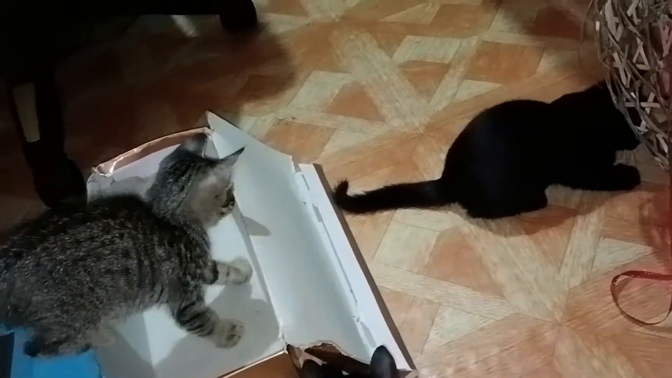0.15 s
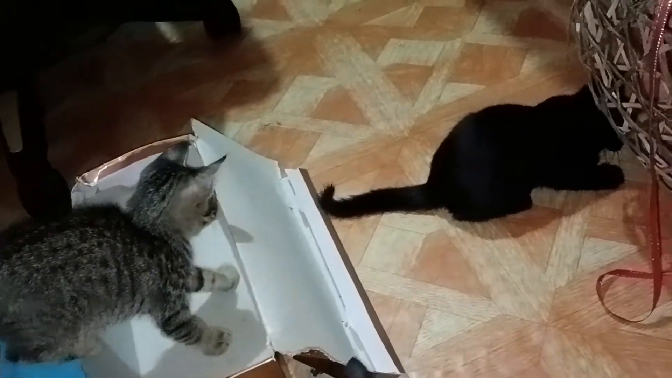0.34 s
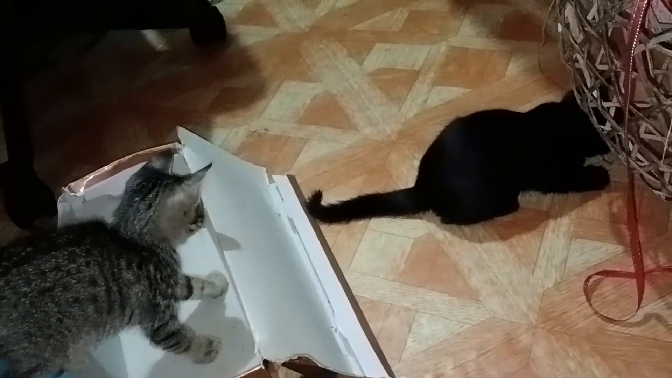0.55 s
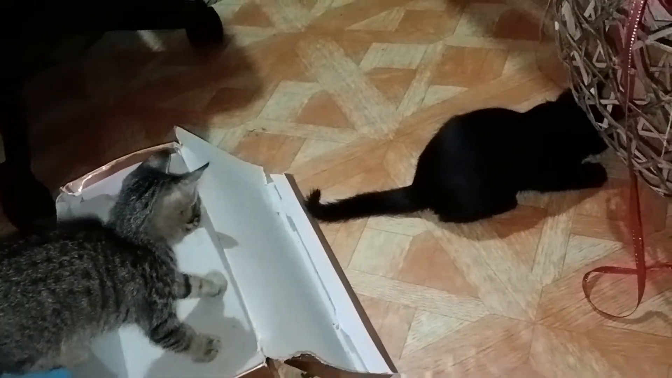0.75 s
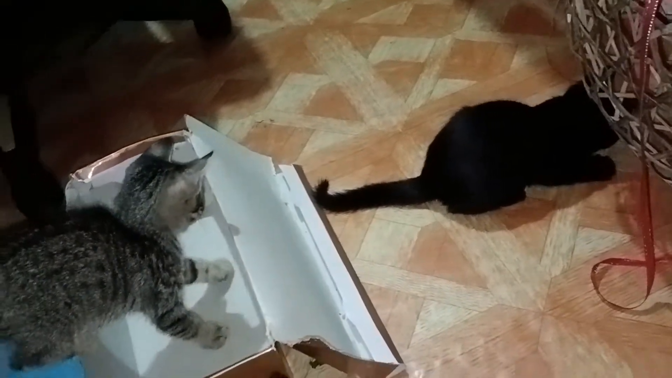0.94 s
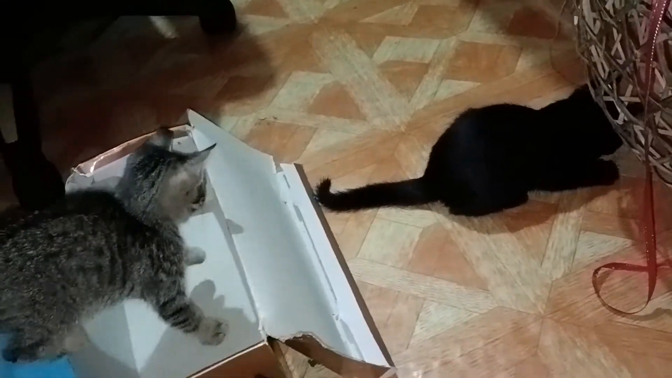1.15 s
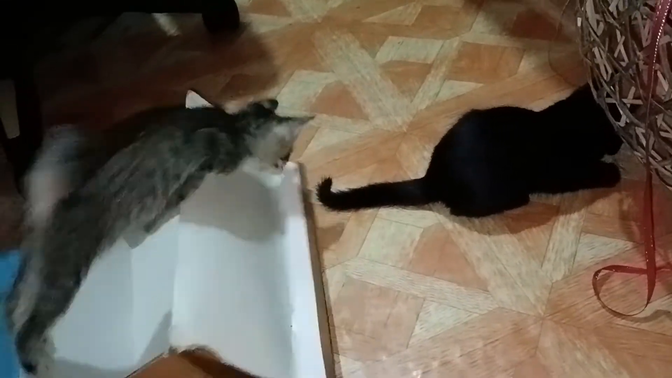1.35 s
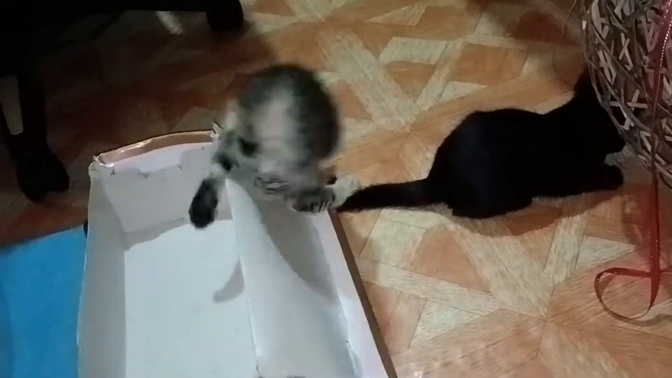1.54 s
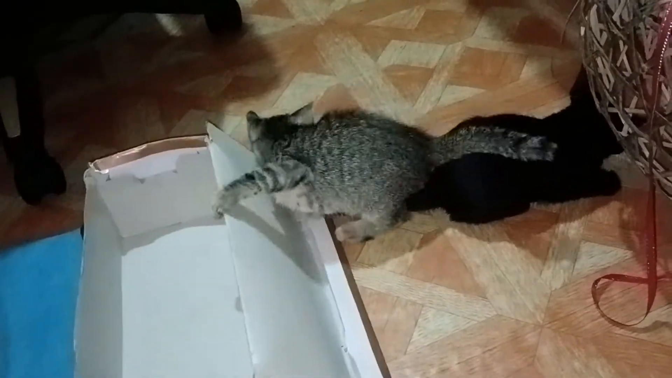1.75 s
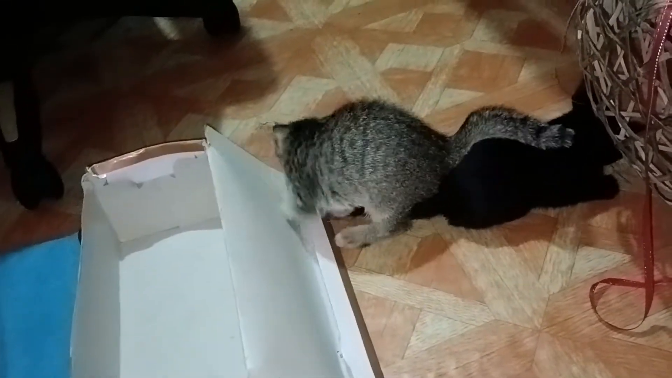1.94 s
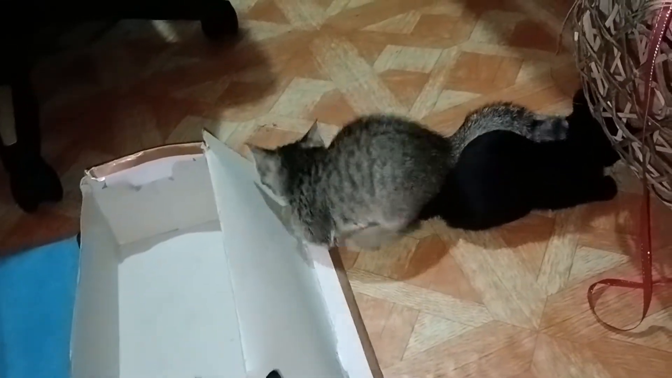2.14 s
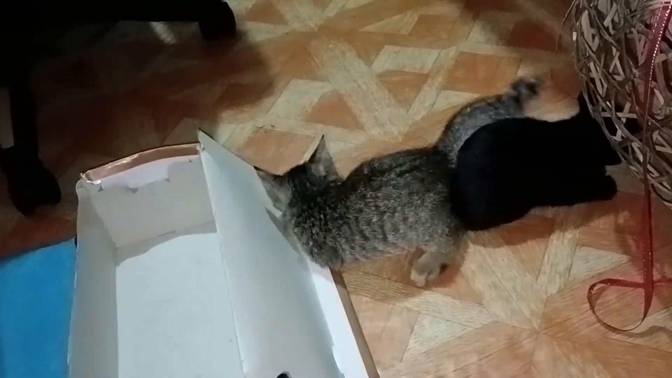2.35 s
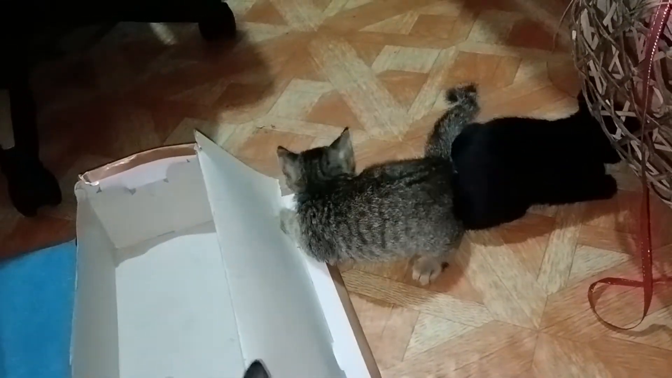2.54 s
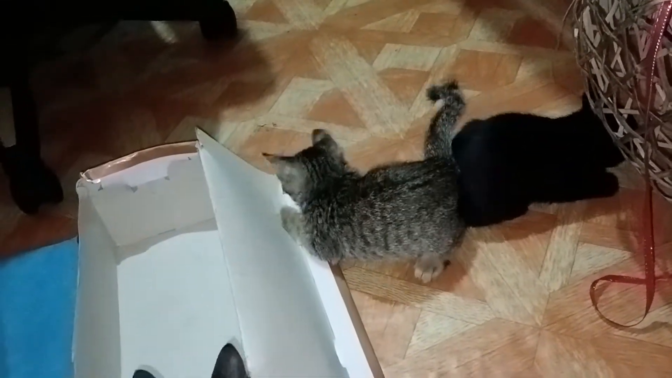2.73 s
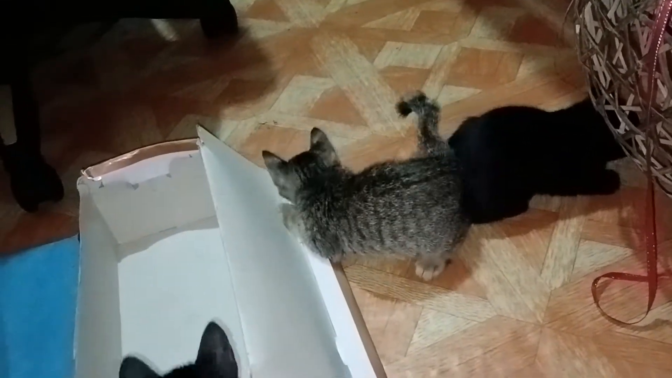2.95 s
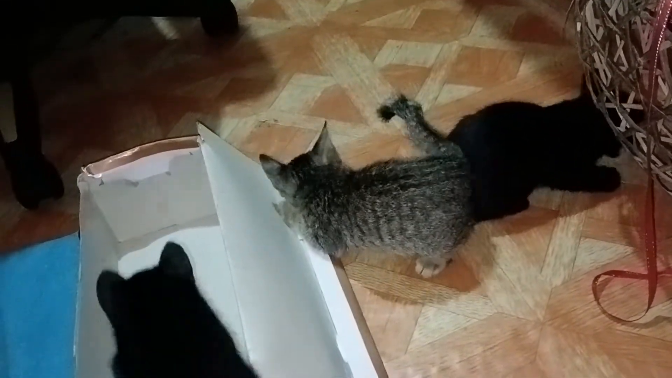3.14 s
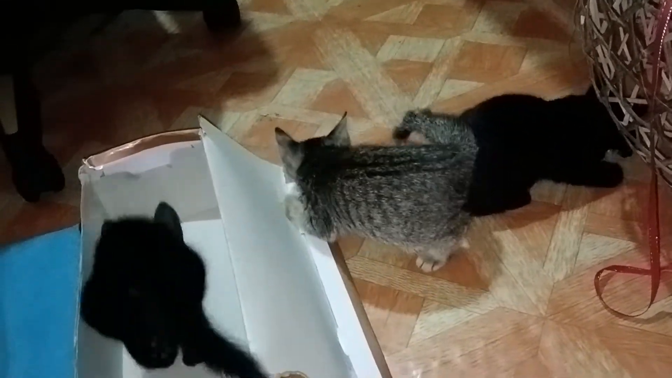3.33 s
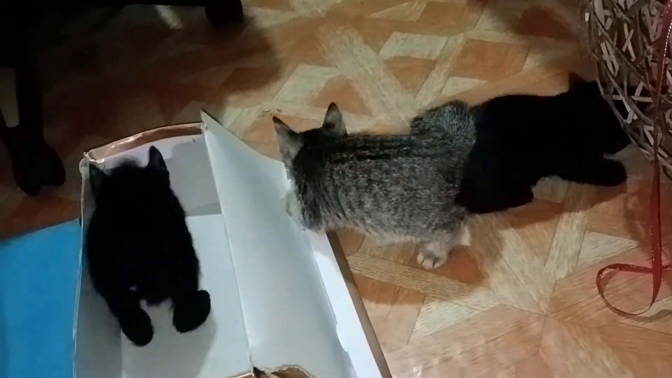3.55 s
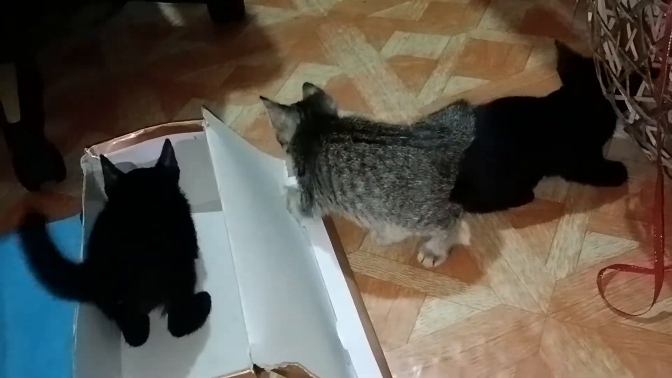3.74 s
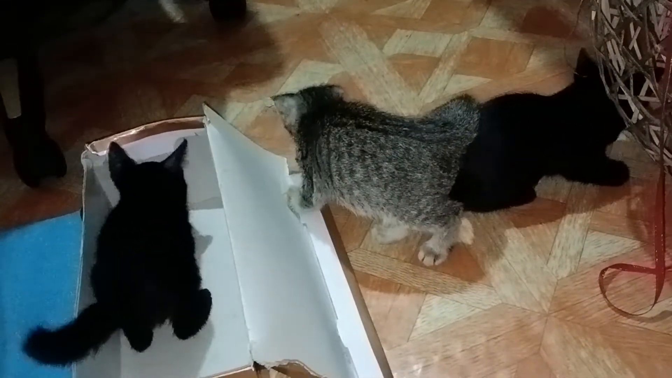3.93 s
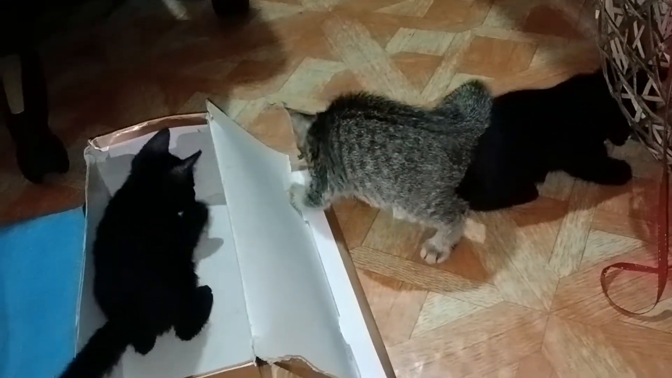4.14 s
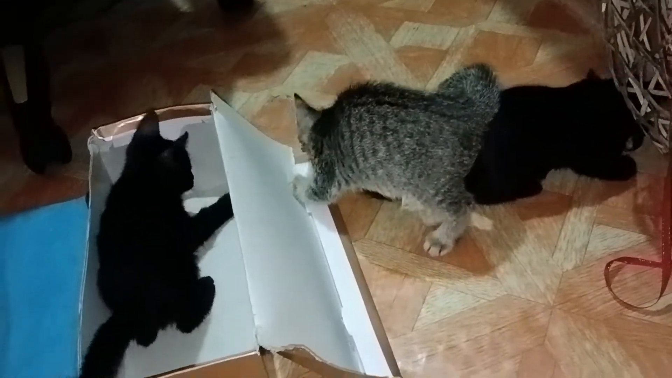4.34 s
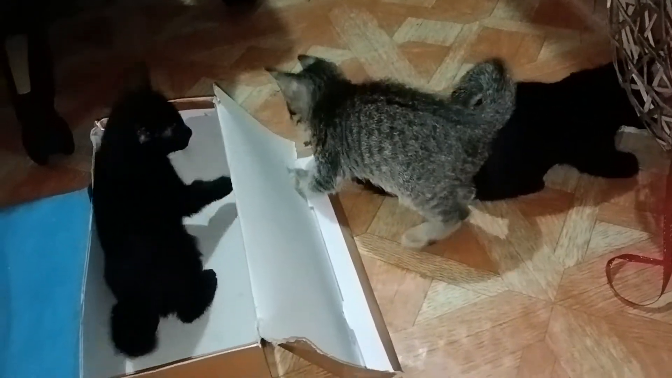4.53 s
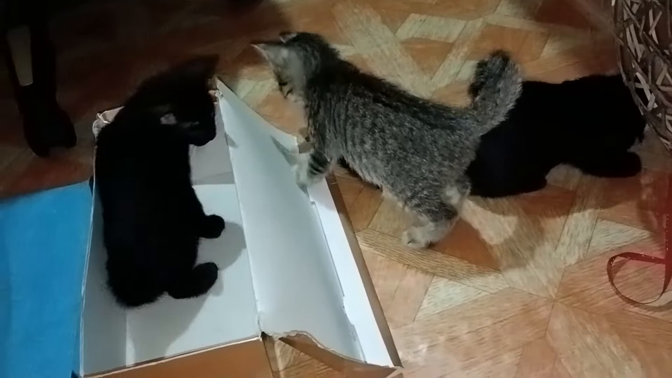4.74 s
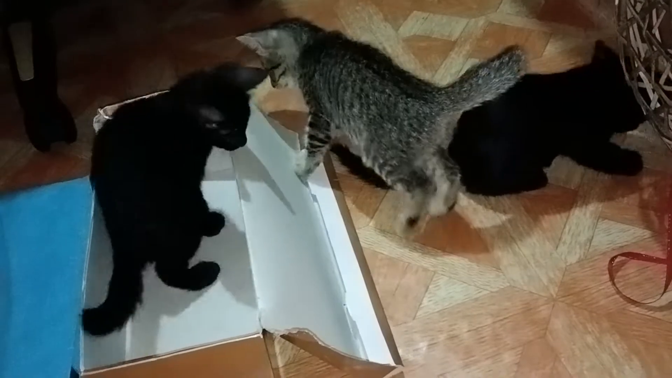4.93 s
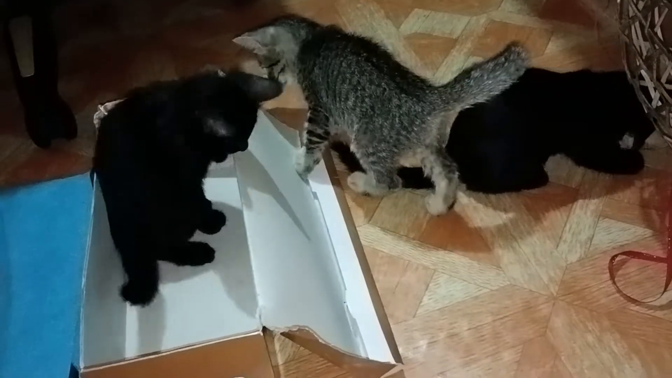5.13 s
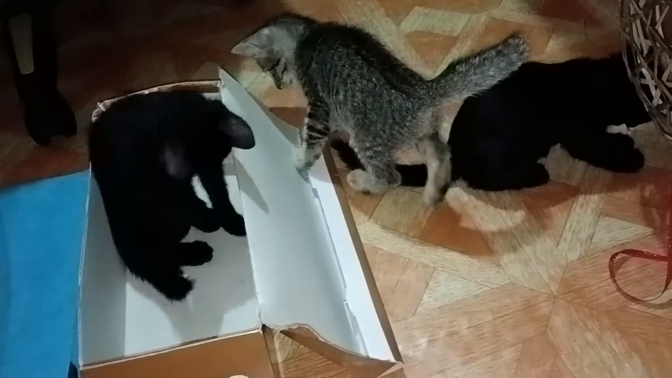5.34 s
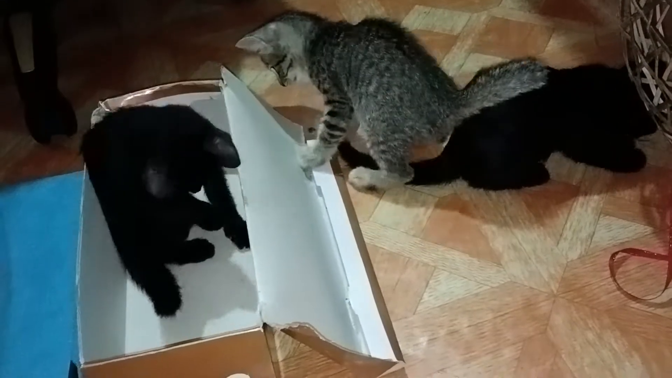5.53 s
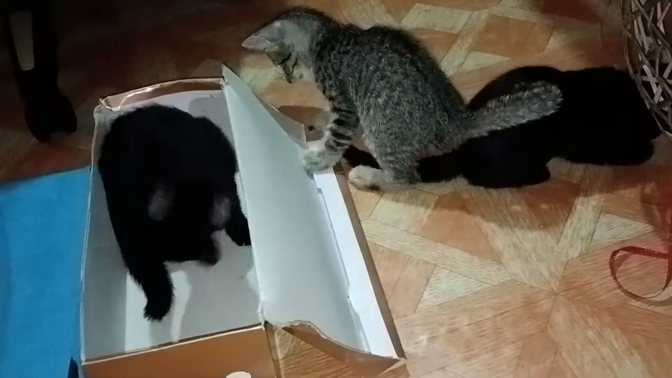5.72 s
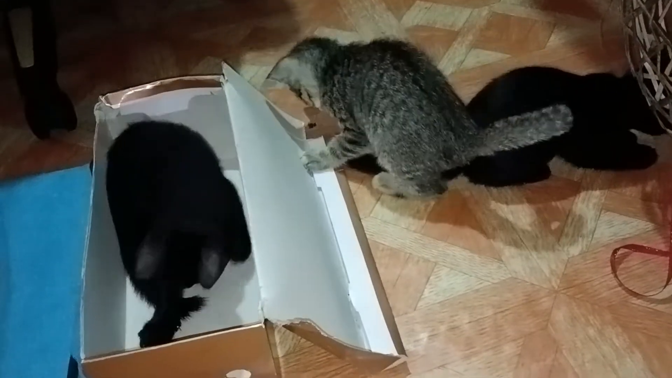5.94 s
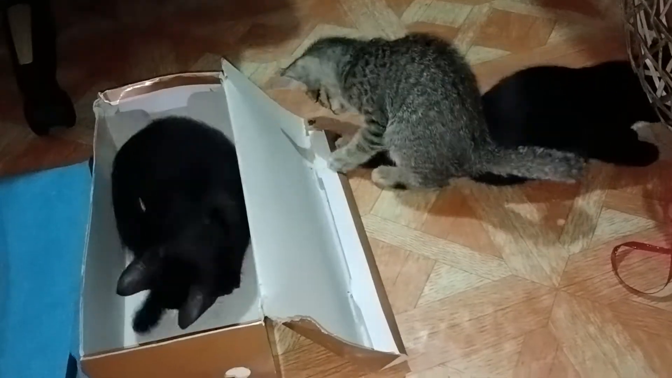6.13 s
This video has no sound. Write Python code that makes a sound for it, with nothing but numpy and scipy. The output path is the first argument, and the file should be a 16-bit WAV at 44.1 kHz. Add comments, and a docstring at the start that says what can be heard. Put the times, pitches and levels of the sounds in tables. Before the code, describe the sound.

Quiet indoor air with a faint low hum. From about 0.1 to 0.6 seconds a kitten gives a thin, high, hoarse squeak a little way off. At 0.7 a claw taps the cardboard box and a paw scrapes it. A hollow thump at 1.3 starts the main scramble, with the strongest thuds, clicks and dry rasping strokes at 1.4 to 1.5 and a low rumble underneath. Lighter knocks and scuffs follow to 2.0, a crisp double tap near 2.2 and another knock at 2.55. A shorter, softer squeak bends up and down at 2.85 to 3.15. Small bumps come at 3.3 and a cluster at 3.5 to 3.6 with a low swell. From 3.7 to 5.4 only faint ticks, brushing and dim tones remain. Small taps return around 5.5, then a clear knock at 5.9 with a sharp scratch, and little clicks until 6.3. Close stereo, short room echo.

```python
"""Kittens on a cardboard box

Kittens climb over a cardboard box in a hard-floored room: paws and claws knock the panels (clicks and
dying noise bursts into panel modes), fur and pads brush over them (grainy noise into the same modes).
A kitten squeaks twice on two tones at once (hoarse sines, their doubles and sum through a throat resonance).
A low sine hum with rumble swells and fades, faint tones of narrow noise come and go over patchy room air."""
import sys
import numpy as np
from scipy import signal
from scipy.fft import rfft, irfft, next_fast_len
from scipy.io import wavfile

SR = 44100
rng = np.random.default_rng(int(sys.argv[2]) if len(sys.argv) > 2 else 0)


def bounce(signal):
    """Save signal as a 16-bit WAV file at the path given by the first command-line argument."""
    frames = np.transpose(np.atleast_2d(signal))
    limited = np.clip(frames, -1, 1)
    pcm = np.round(limited * 32767).astype(np.int16)
    wavfile.write(sys.argv[1], SR, pcm)


N = 276973


def from_db(db):
    """Gain of a level in dB."""
    return 10 ** (np.asarray(db) / 20)


def rms_one(x):
    """Scaled to rms 1."""
    return x / np.sqrt(np.mean(x ** 2) + 1e-20)


def in_time(rows):
    """Columns of a curve, interpolated at every sample."""
    s, *columns = np.transpose(rows)
    return [np.interp(np.arange(N) / SR, s, c) for c in columns]


def gate(start_s, end_s, fade_s):
    """1 between two times, with linear edges inside them."""
    t = np.arange(N) / SR
    return np.clip(np.minimum(t - start_s, end_s - t) / fade_s, 0, 1)


def drift(rate_hz):
    """Random wander of rms 1: noise through two equal poles, computed every 40 samples."""
    pole = np.exp(-2 * np.pi * rate_hz * 40 / SR)
    noise = rng.standard_normal(N // 40 + 2002)
    slow = signal.lfilter([1], [1, -2 * pole, pole * pole], noise)[2000:]   # settled part
    return np.interp(np.arange(N) / 40, np.arange(len(slow)), rms_one(slow))


def resonate(x, hz, width_hz):
    """Two-pole resonance with a peak gain of 1."""
    r = np.exp(-np.pi * width_hz / SR)
    top = [(1 - r * r) / 2, 0, (r * r - 1) / 2]
    return signal.lfilter(top, [1, -2 * r * np.cos(2 * np.pi * hz / SR), r * r], x)


def pair(alike):
    """Left and right white noise with correlation alike, 0-1."""
    alike = np.clip(alike, 0, 1)
    mid, side = rng.standard_normal((2, N))
    return (np.sqrt(1 + alike) * mid + np.sqrt(1 - alike) * side * np.array([[1], [-1]])) / np.sqrt(2)


# spectrum of the air, relative: (pitch_hz, density_db)
AIR_SPECTRUM = [(15, -40), (25, -17.5), (75, 8), (178, -9.5), (297, 2.5), (457, -27.5), (537, -12),
                (703, -10), (1110, -21.5), (2300, -16), (4260, -37), (6730, -21), (7300, -45), (10900, -33),
                (15500, -34)]
AIR_DB = -74


def room_air():
    """Patchy background noise in quarter-octave bands, most alike left and right in the bass."""
    hz_points, db_points = np.transpose(AIR_SPECTRUM)
    edges_hz = 25 * 2 ** np.arange(0, 9.4, .25)
    together = drift(3)   # shared by all bands
    deep, thin = pair(0.53), [pair(0.16), pair(.3)]
    out = 0
    for k, (low, high) in enumerate(zip(edges_hz, edges_hz[1:])):
        white = deep if high < 130 else thin[k % 2]
        band = signal.sosfilt(signal.butter(2, [low, high], "band", fs=SR, output="sos"), white)
        db = np.interp(np.log(low * high) / 2, np.log(hz_points), db_points)
        patchy_db = 4.0 * drift(26) + 5.6 * drift(14) + .6 * together
        out = out + from_db(db + patchy_db) * band
    return from_db(AIR_DB) * rms_one(out)


# hum swells; those under two edges long stay below level_db: (start_s, length_s, pitch_hz, level_db)
HUM_SWELLS = [(0.308, 0.081, 70, -60), (0.468, 0.37, 73.1, -63.5), (0.84, 0.54, 75.44, -69),
              (1.284, 0.15, 68.4, -52.5), (1.41, 0.099, 69.6, -45.5), (1.506, 0.08, 70.6, -44.5),
              (1.574, 0.14, 77.4, -62), (1.75, 0.11, 79.9, -67), (1.96, 0.13, 78.2, -60),
              (2.078, 0.077, 72.9, -58.5), (2.25, 0.11, 77.4, -64.5), (2.82, .15, 77, -77),
              (3.03, 0.089, 75.6, -64), (3.198, 0.13, 73.6, -78.5), (3.611, 0.15, 79.4, -49),
              (3.711, 0.11, 81.7, -53), (3.87, .15, 78.5, -69), (4.226, 0.26, 73, -87),
              (4.603, 0.098, 71.9, -60), (4.78, .12, 70.5, -58), (4.971, 0.14, 72.25, -61),
              (5.08, 0.19, 73.45, -57.5), (5.329, 0.47, 71.7, -62), (6.006, 0.12, 67.5, -71),
              (6.217, 0.1, 69.2, -72)]
HUM_EDGE_S, HUM_REST_DB = 0.059, -87


def hum():
    """A low sine in swells, gliding between the pitches at their middles, with a rumble around it."""
    hz, = in_time([(s + length / 2, hz) for s, length, hz, db in HUM_SWELLS])
    level = from_db(HUM_REST_DB)
    for s, length, _, db in HUM_SWELLS:
        level = level + from_db(db) * gate(s, s + length, HUM_EDGE_S) ** 1.5
    tone = np.sqrt(2) * np.sin(np.cumsum(2 * np.pi * hz / SR))
    rumble = rms_one(resonate(resonate(pair(.6), 55, 50), 55, 50))
    sides = from_db([[.6], [-.6]])
    return level * from_db(1.5 * drift(18)) * (tone + from_db(-9.5) * rumble) * sides


# faint narrow swells: (start_s, length_s, pitch_hz, width_hz, level_db)
FAINT_TONES = [(0.019, 0.14, 592, 41, -70), (0.053, 0.19, 1466, 147, -58.5), (0.097, 0.34, 2063, 390, -63),
               (0.436, 0.2, 2210, 250, -61.5), (0.528, 0.063, 1114, 57, -61), (0.507, 0.13, 625, 47, -74.5),
               (0.802, 0.11, 2342, 320, -67.5), (0.877, 0.056, 1260, 33, -74.5),
               (1.059, 0.06, 1485, 110, -69.5), (1.783, 0.072, 2003, 130, -66),
               (2.147, 0.033, 960, 98, -68), (2.589, 0.081, 228, 13, -60), (2.871, 0.2, 1873, 206, -62),
               (3.092, 0.14, 1720, 220, -60.5), (3.103, 0.24, 1446, 120, -64),
               (3.276, 0.077, 152.6, 10, -58.5), (3.303, 0.37, 885, 61, -70), (3.43, 0.051, 1670, 220, -65),
               (3.455, 0.031, 4330, 370, -62.5), (3.729, 0.06, 2008, 260, -64.5),
               (4.032, 0.21, 648, 60, -76), (4.213, 0.044, 3870, 360, -75), (4.25, 0.034, 1610, 87, -51.5),
               (4.261, 0.079, 1930, 240, -57.5), (4.424, 0.13, 1830, 450, -59.5),
               (4.547, .11, 1200, 150, -64.5), (4.55, 0.21, 993, 19, -71), (4.88, 0.11, 1150, 66, -71),
               (4.958, 0.052, 438, 60, -69), (5.279, 0.17, 1433, 100, -70.5), (5.365, 0.18, 795, 40, -66.5),
               (5.768, 0.066, 1625, 67, -67), (5.828, 0.067, 513, 29, -67.5), (6.041, 0.035, 702, 21, -58),
               (6.037, 0.27, 1574, 18, -64.5), (6.123, 0.09, 607, 35, -67), (6.216, 0.036, 980, 52, -68)]
TONES_LEFT_DB = 3   # left over right


def faint_tones():
    """Short swells of white noise narrowed by two equal resonances."""
    out = np.zeros((2, N))
    for s, length, hz, width, db in FAINT_TONES:
        at, size = round(s * SR), round(length * SR)
        noise = rng.standard_normal((2, SR // 2))
        narrow = rms_one(resonate(resonate(noise, hz, width), hz, width)[:, -size:])
        swell = np.sin(np.pi * np.linspace(0, 1, size) ** 0.61) ** 1.05
        sides = from_db([[db + TONES_LEFT_DB / 2], [db - TONES_LEFT_DB / 2]])
        piece = out[:, at:at + size]
        piece += (sides * narrow * swell)[:, :piece.shape[1]]
    return out


# path of each squeak's two tones: (time_s, low_hz, low_db, high_hz, high_db)
SQUEAK_PATHS = [
    [(0.13, 2155, -63, 2600, -95), (0.17, 2204, -59, 2562, -67), (0.25, 2169, -64.5, 2527, -62),
     (0.33, 2213, -60.5, 2595, -59), (0.43, 2276, -62, 2560, -57.5), (0.5, 2226, -65, 2546, -66),
     (0.64, 2246, -98, 2550, -86)],
    [(2.83, 1781, -80, 2283, -100), (2.86, 1816, -66.5, 2283, -92), (2.936, 1977, -58, 2285, -67),
     (3.056, 2039, -56, 2335, -65), (3.104, 2016, -61.5, 2270, -67.5), (3.135, 1986, -60, 2210, -76.5),
     (3.17, 1830, -75.5, 2230, -80.5)],
]
# hoarseness of each squeak: (rough_0_to_1)
SQUEAK_ROUGHNESS = [.17, .25]
# overtone levels of each squeak, before the throat: (low_double_db, sum_db, high_double_db)
SQUEAK_OVERTONES = [(-11.5, -16, -14), (-21.5, -31.5, -30.5)]
THROAT_HZ, THROAT_WIDTH_HZ = 4400, 1030   # resonance that passes the overtones


def squeaks():
    """Two wavering, hoarse tones in one throat, mixed into their doubles and their sum."""
    out = np.zeros(N)
    for rows, rough, overtones_db in zip(SQUEAK_PATHS, SQUEAK_ROUGHNESS, SQUEAK_OVERTONES):
        low_hz, low_db, high_hz, high_db = in_time(rows)
        sounding = gate(rows[0][0], rows[-1][0], 0.0086)
        waves = []
        for hz, db in ((low_hz, low_db), (high_hz, high_db)):
            waver = 1 + 0.003 * drift(30) + .022 * rough * drift(120)
            phase = np.cumsum(2 * np.pi * hz * waver / SR)
            hoarse = 1 + rough * drift(72)
            size = np.sqrt(2) * from_db(db + 2.2 * drift(22)) * hoarse * sounding
            waves.append((phase, size))
        (p, a), (q, b) = waves
        double_gain, sum_gain, upper_gain = from_db(overtones_db)
        mixed = double_gain * a * np.sin(2 * p) + upper_gain * b * np.sin(2 * q)
        mixed += sum_gain * np.sqrt(abs(a * b)) * np.sin(p + q)
        throat = resonate(resonate(mixed, THROAT_HZ, THROAT_WIDTH_HZ), THROAT_HZ, THROAT_WIDTH_HZ)
        out += a * np.sin(p) + b * np.sin(q) + throat
    return out


# faint restless shuffling between the strokes: (time_s, level_db)
SHUFFLING = [(0, -120), (.64, -115), (.7, -85), (1.1, -97.5), (1.3, -93), (1.7, -79), (2.1, -96.5),
             (2.22, -84.5), (2.36, -97), (2.5, -87), (2.8, -92), (2.95, -110), (3.2, -86.5), (3.8, -91.5),
             (4.3, -90.5), (4.9, -88), (5.5, -87.5), (6.28, -79)]
# offset of the shuffling in each group of modes: (hollow_db, panel_db, rasp_db, sheen_db)
SHUFFLE_OFFSETS = [2.5, -2.34, -5.5, -4.5]
# single strokes of a paw along the card: (peak_s, rise_s, fall_s, hollow_db, panel_db, rasp_db, sheen_db)
PAW_STROKES = [(.755, 0.037, 0.042, -86, -57.5, -49.5, -60.5), (1.105, 0.058, 0.033, -107, -101, -71, -71),
               (1.17, 0.034, 0.06, -88, -88, -76.5, -101), (1.348, 0.096, 0.056, -65, -51, -47, -59),
               (1.43, 0.062, 0.073, -63, -49, -47.5, -55.5), (1.5, 0.024, 0.092, -67, -44.5, -41.5, -47),
               (1.64, 0.037, 0.092, -74, -59.5, -54.5, -68.5), (1.72, 0.18, 0.099, -67, -74, -71, -66),
               (1.899, 0.045, 0.023, -89, -64, -63, -66), (2.02, 0.045, 0.051, -69.5, -62.5, -58, -71),
               (2.175, 0.0084, 0.014, -90, -72, -60, -65), (2.262, 0.076, 0.047, -88, -69, -57.5, -61),
               (2.441, 0.053, 0.2, -93.5, -60.5, -69.5, -96), (2.533, 0.054, 0.067, -89, -73, -53, -57.5),
               (3.01, .04, 0.047, -92, -98, -74, -73), (3.191, 0.016, 0.05, -95, -81, -68, -73.5),
               (3.289, 0.017, 0.027, -62.5, -75, -60.5, -68), (3.49, 0.067, 0.08, -75.5, -69, -78, -67),
               (3.62, 0.094, .06, -70, -80, -67, -78), (3.659, 0.021, 0.04, -73, -83, -74, -88),
               (3.931, 0.036, 0.09, -86.5, -86, -85.5, -78.5), (4.089, 0.027, 0.072, -93, -97, -100, -75),
               (4.261, 0.021, 0.04, -87, -99, -73.5, -72.5),
               (4.478, 0.054, 0.088, -88, -57.5, -75.5, -85.5),
               (5.151, 0.054, 0.065, -91.5, -91.5, -81.5, -66.5),
               (5.31, 0.053, 0.081, -81.5, -76, -84, -95.5), (5.53, 0.088, 0.062, -99, -93, -65, -75),
               (5.632, 0.027, 0.025, -86, -76.5, -72, -72), (5.92, 0.098, 0.031, -76, -74, -66, -75),
               (5.974, 0.015, 0.03, -98, -56.5, -44, -47.5), (6.04, 0.06, 0.062, -110, -74, -58.5, -66)]


def rubbing():
    """Level that shakes each group of modes: faint shuffling plus strokes that swell and fade."""
    shuffle_db, = in_time(SHUFFLING)
    level = np.array([from_db(shuffle_db + db + 3.0 * drift(4)) for db in SHUFFLE_OFFSETS])
    t = np.arange(N) / SR
    for s, rise, fall, *colour_db in PAW_STROKES:
        swell = np.exp(-2 * ((t - s) / np.where(t < s, rise, fall)) ** 2)
        level = level + from_db(colour_db)[:, None] * swell
    return level * from_db(2.0 * drift(79) + 1.1 * drift(25))   # fibres catch and slip


# knocks on the box:
# (time_s, thump_db, panel_db, claw_db, treble_fall_db_per_octave, favoured_hz, t60_s, left_over_right_db)
BOX_KNOCKS = [(0.683, -91, -37.5, -44, 18.5, 1970, 0.22, -1.5),
              (1.095, -100, -99, -75.5, 0, 4860, 0.18, -12), (1.232, -101, -99, -63.5, 12, 2500, 0.14, 7),
              (1.287, -26.5, -31, -68, 18, 410.6, 0.14, 1), (1.405, -49, -45, -69.5, -13, 685, 0.3, 0),
              (1.453, -30.5, -40, -31.5, 12.5, 456, 0.081, -2.5),
              (1.486, -23.5, -31, -27.5, 6.5, 2153, 0.16, 2), (1.669, -81, -64, -47, 7, 2240, 0.17, 0),
              (1.707, -57, -49, -53, 7, 750, 0.14, -5.5), (1.777, -72, -53, -59, 19, 1170, 0.14, 3.5),
              (1.861, -99, -50, -59.5, -3, 1220, 0.16, -3.5), (1.958, -81, -76.5, -55, 1, 2000, 0.15, -2.5),
              (1.98, -68, -42.5, -47.5, 7.5, 735, 0.13, -4.5), (2.183, -46, -36, -34, 10.5, 1092, 0.16, -2),
              (2.236, -63, -70, -40, 5.5, 2325, 0.092, -8),
              (2.55, -49.5, -41, -44.5, 11.5, 533, 0.11, -0.6), (3.189, -91, -94, -59, 2, 1905, 0.2, -9),
              (3.269, -54.5, -48, -59, 2, 703, 0.18, -1.7), (3.488, -82, -83, -60.5, -0.5, 820, 0.15, -2.5),
              (3.532, -41, -40, -41, 11, 785, 0.24, -1.5), (3.567, -40, -49, -58, 25, 480, 0.09, 0),
              (3.593, -68.5, -43, -40, 24, 2640, 0.15, -1), (3.681, -89, -94, -81, -8, 11840, 0.13, 2.3),
              (3.996, -88.5, -98, -78, -2.5, 5330, 0.17, -8.5),
              (4.433, -91, -56, -71, 21.5, 917, 0.19, -4.5),
              (4.825, -83, -89.5, -76.5, -6, 2535, 0.46, -0.5),
              (4.882, -84.5, -78, -75, 4, 1182, 0.23, 3.5),
              (5.411, -63, -62.5, -56.5, 27.5, 2180, 0.16, -4), (5.449, -66, -78, -53.5, 1, 2330, 0.2, -1),
              (5.518, -89, -61.5, -49.5, 36, 2320, 0.14, 2.5), (5.591, -83, -92, -62.5, 21, 1925, 0.24, 6),
              (5.735, -105.5, -92.5, -66, 13, 5300, 0.17, -4),
              (5.881, -41.5, -37.5, -34, 10, 2476, 0.15, -0.5), (6.04, -90, -68, -55, 20, 2080, 0.11, -1),
              (6.16, -72.5, -74, -40, 20, 3430, 0.16, -4), (6.183, -93, -67, -51, 6, 2000, 0.13, 2)]
# modes of the box panels: (pitch_hz, width_hz, level_db)
BOX_MODES = [(172.7, 10, -2), (222.5, 12, -2), (308, 60, 1.5), (373, 42, 0), (429.7, 47, 3.5),
             (540, 260, -4), (670, 96, -1.5), (718, 57, 4), (816, 150, -1.5), (1015, 81, 0),
             (1182, 95, -2.5), (1396, 88, -2.5), (1510, 150, -6.5), (1833, 110, 0.5), (2036, 96, 1),
             (2290, 160, -1), (2620, 110, -4), (2900, 250, -6), (3250, 140, -3.5), (3570, 680, -9),
             (4200, 230, -9), (4706, 290, 2), (5040, 1200, 1.5), (6920, 700, -5), (7760, 330, -7),
             (8960, 480, -8.5), (10520, 1200, -1), (12000, 3700, -4), (14300, 970, -12)]
# borders between hollow, panel, rasp and sheen modes: (border_hz)
GROUP_BORDERS = [600, 1500, 4000]
# left-right likeness of the noise in each group of modes: (alike_0_to_1)
GROUP_LIKENESS = [.93, 0.3, 0.42, 0.15]
# where thump, panel and claw levels hold: (pitch_hz)
KNOCK_COLOUR_POINTS = [447, 980, 1990]
TREBLE_HZ = 3000   # a knock's treble falls from here
BOOM_HZ, FULL_THUMP_DB, BOOM_LOSS = 330, -25, 0.43   # modes below lose dB per dB short of a full thump
SLAP, SLAP_DECAY_S, CLICK, RISE_S = 1.4, 0.0039, 0.8, .0012   # first contact


def box():
    """Each blow is a click and a dying burst of noise into the panel modes; brushing adds grainy noise."""
    hz, width, mode_db = np.transpose(BOX_MODES)
    group = np.searchsorted(GROUP_BORDERS, hz)
    power = from_db(2 * mode_db) * np.pi * width / SR
    noise_gain = np.sqrt(np.bincount(group, power)[group])   # of each group of modes to white noise
    brush = rubbing()
    noise = [pair(alike) for alike in GROUP_LIKENESS]
    # the rubbed spot wanders
    shake = np.array([noise[k] * brush[k] * from_db(2.8 * drift(4.9)) for k in group])

    luck = rng.standard_normal((len(BOX_KNOCKS), len(BOX_MODES)))
    for knock, chance in zip(BOX_KNOCKS, luck):
        s, thump_db, panel_db, claw_db, fall_db, favoured_hz, t60_s, pan_db = knock
        at = round(s * SR)
        age = np.arange(min(N - at, SR // 3)) / SR
        colour_db = np.interp(np.log(hz), np.log(KNOCK_COLOUR_POINTS), [thump_db, panel_db, claw_db])
        colour_db -= fall_db * np.log2(np.maximum(hz / TREBLE_HZ, 1))
        colour_db -= (hz < BOOM_HZ) * BOOM_LOSS * (FULL_THUMP_DB - thump_db)
        # the spot struck favours some modes
        near_db = 7.7 * np.exp(-(np.log2(hz / favoured_hz) / 0.18) ** 2)
        size = from_db(colour_db + near_db + 2.5 * chance)
        dying = from_db(-60 * age / t60_s) + SLAP * np.exp(-age / SLAP_DECAY_S)   # rattle plus slap
        sides = from_db([pan_db / 2, -pan_db / 2])
        burst = sides[:, None] * dying * (1 - np.exp(-age / RISE_S))
        for j, k in enumerate(group):
            shake[j, :, at:at + len(age)] += size[j] * burst * noise[k][:, at:at + len(age)]
            shake[j, :, at] += CLICK * size[j] * sides / noise_gain[j]

    signs = (-1) ** np.arange(len(BOX_MODES))
    gains = signs * from_db(mode_db) / noise_gain
    return sum(g * resonate(x, f, w) for g, x, f, w in zip(gains, shake, hz, width))


ROOM_T60_S, ROOM_DB, FAR_ROOM_DB = 0.2, -13.5, 4   # low-pitch decay; sends of box and squeaks


def room(x):
    """Six feedback delays a side, taken on a padded frequency grid; the walls swallow the treble."""
    size = next_fast_len(N + SR)
    hz = np.arange(size // 2 + 1) * SR / size
    t60_s = ROOM_T60_S / (1 + hz / 9000)
    response = np.zeros((2, len(hz)), complex)
    for k, lag_s in enumerate(rng.uniform(0.0083, .03, 12)):
        loop = from_db(-60 * lag_s / t60_s) * np.exp(-2j * np.pi * hz * lag_s)
        response[k % 2] += loop / (1 - loop) * (-1) ** (k // 2)
    thin = hz / (hz + 700)   # a small room returns little bass
    return irfft(rfft(x, size) * response * thin, size)[:, :N]


RIGHT_LAG_SAMPLES = 8


def scene():
    """Box close by, squeaks further off, all over the air of the room."""
    card, voice = box(), squeaks()
    wet = room(from_db(ROOM_DB) * card.mean(0) + from_db(FAR_ROOM_DB) * voice)
    near = card + voice * from_db([[1.5], [-1.5]])
    # direct sound reaches the right channel later
    near[1] = np.concatenate([np.zeros(RIGHT_LAG_SAMPLES), near[1, :-RIGHT_LAG_SAMPLES]])
    return near + wet + faint_tones() + hum() + room_air()


CUTOFF_HZ = 15850


def record(dry):
    """A steep elliptic low-pass cuts the top."""
    return signal.sosfilt(signal.ellip(10, .5, 75, CUTOFF_HZ, fs=SR, output="sos"), dry)


dry = scene()
out = record(dry)
bounce(out)
```